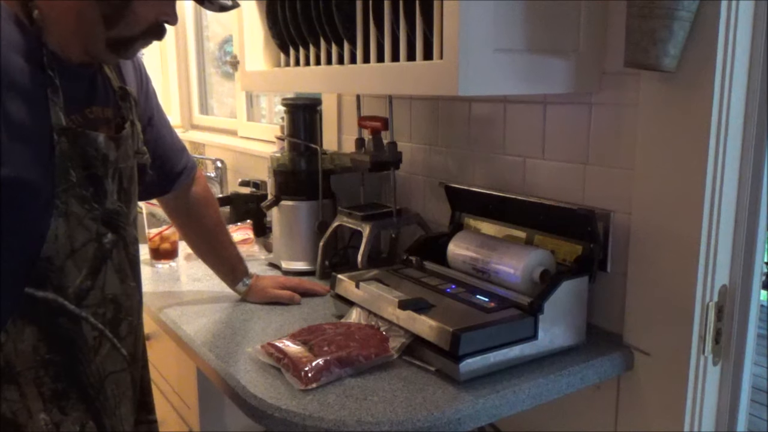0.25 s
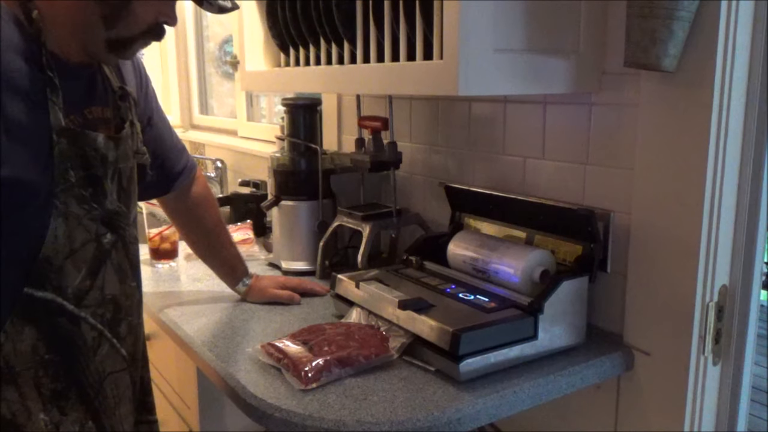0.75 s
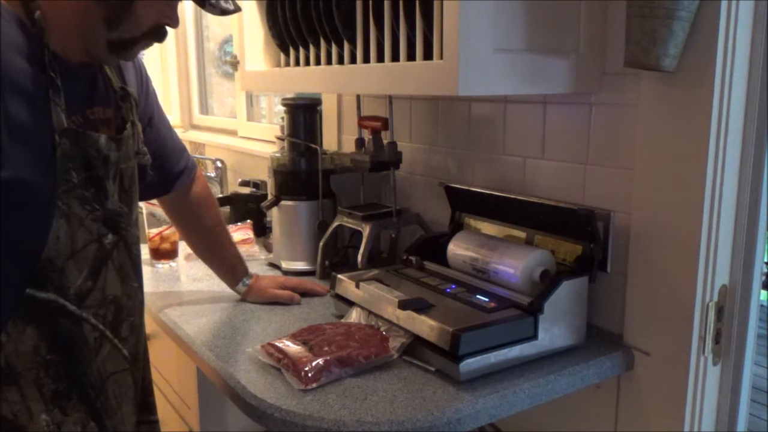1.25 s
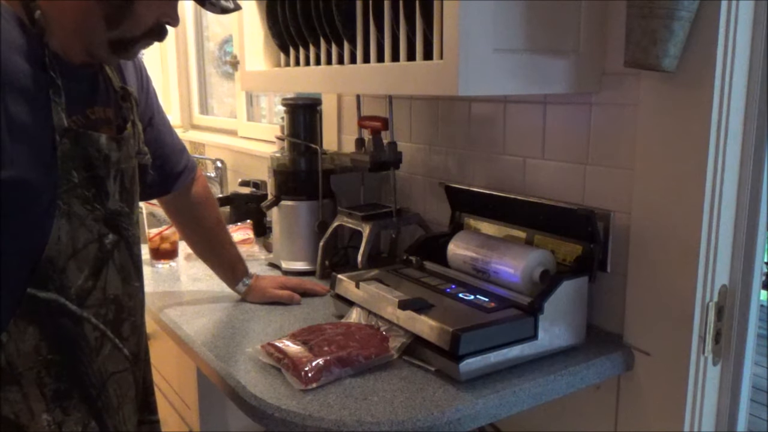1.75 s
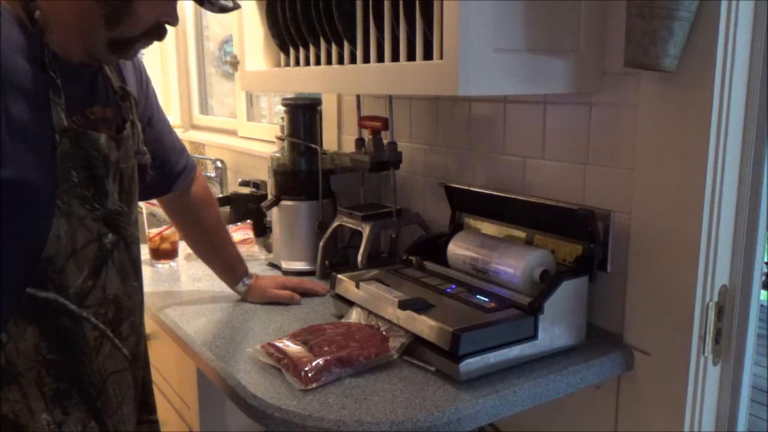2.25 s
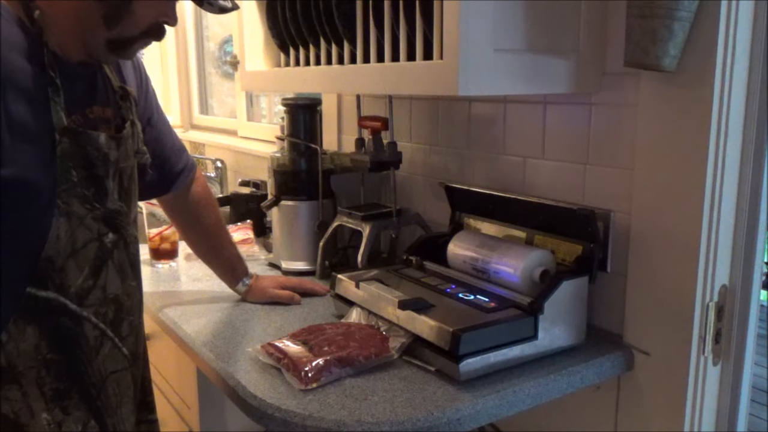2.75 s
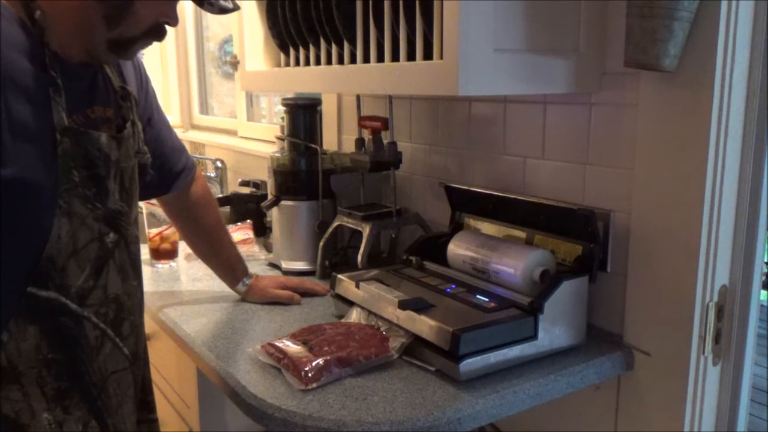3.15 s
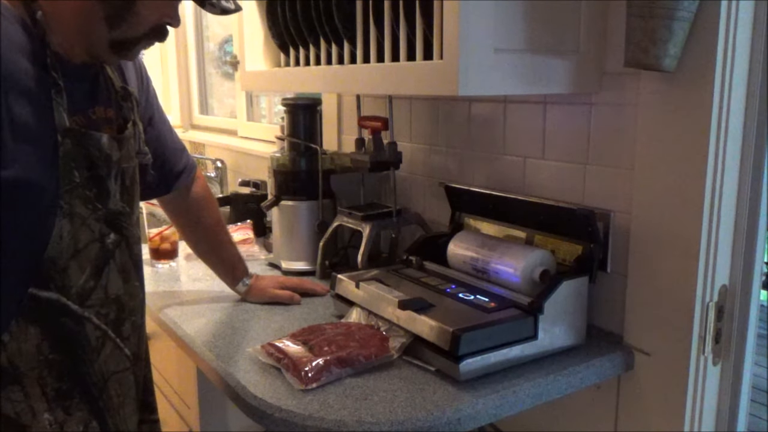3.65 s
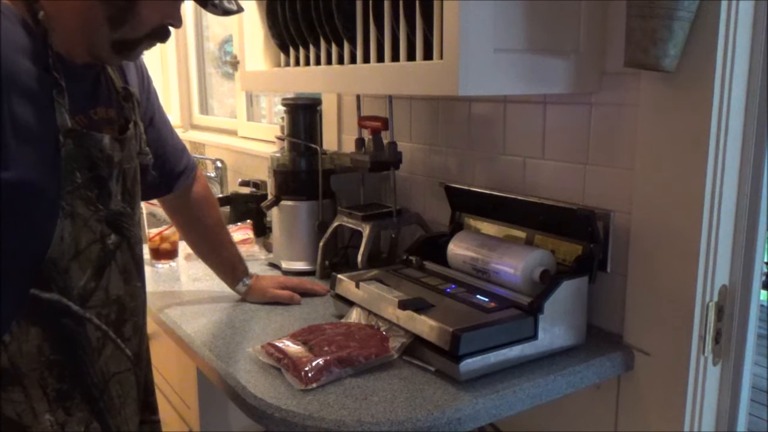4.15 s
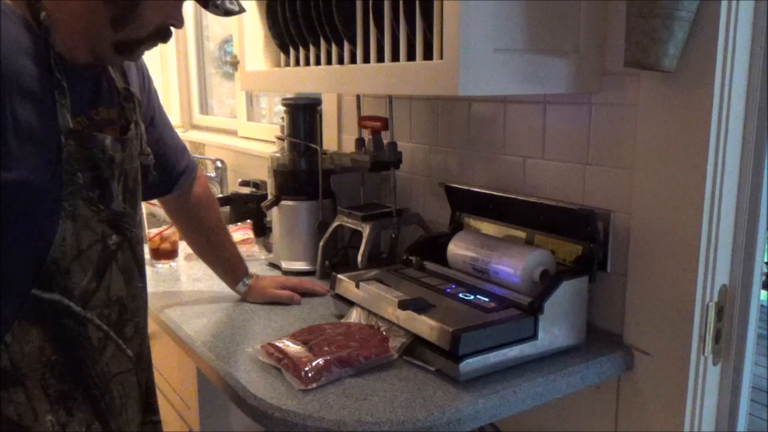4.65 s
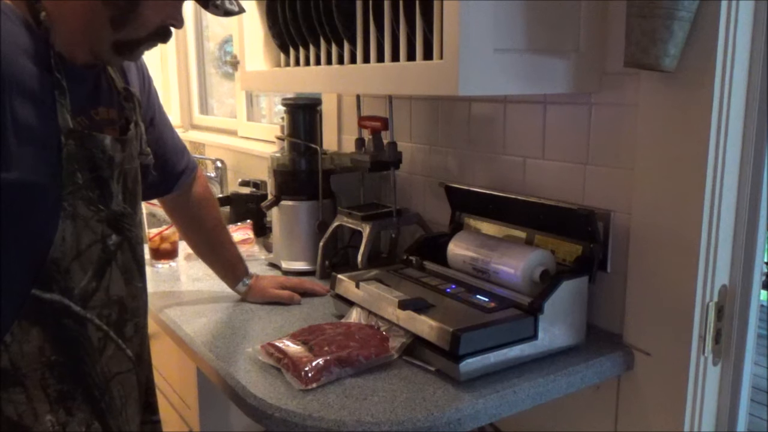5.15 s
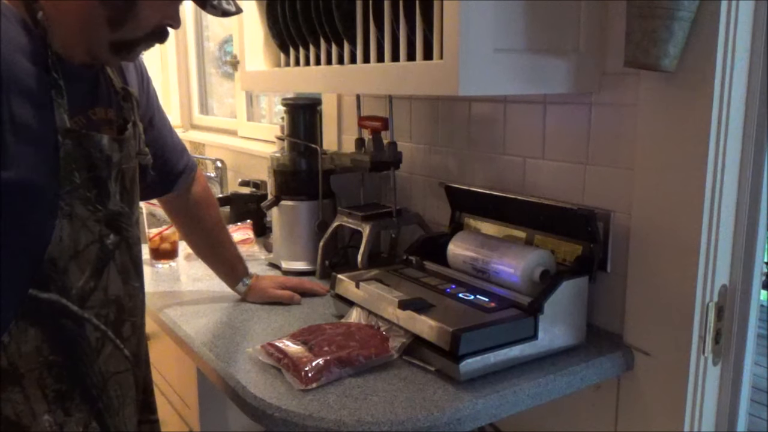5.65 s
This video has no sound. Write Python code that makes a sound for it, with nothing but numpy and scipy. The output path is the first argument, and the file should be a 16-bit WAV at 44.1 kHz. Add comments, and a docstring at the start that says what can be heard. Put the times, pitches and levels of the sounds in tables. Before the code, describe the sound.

A kitchen vacuum sealer pump drones and rattles steadily, then cuts out with dull thumps, leaving quiet room hum and two faint squeaks.

```python
"""Vacuum sealer in a small kitchen

A vacuum sealer pumps air out of a bag, cuts out and gives a few last thumps, then two thin squeaks of air.
Steady tones locked to the turning shaft make the drone; they shift as the bag tightens.
Knocks and valve clicks in each turn ring the casing and valve plate, and shaped noise makes the air.
The tiled room answers the rattle; a low appliance hum and faint hiss run throughout."""
import sys
import numpy as np
from scipy import signal
from scipy.fft import rfft, irfft, next_fast_len
from scipy.io import wavfile
from scipy.ndimage import uniform_filter1d, map_coordinates

SR = 44100
rng = np.random.default_rng(int(sys.argv[2]) if len(sys.argv) > 2 else 0)


def store_pcm(level_fs):
    """Save levels as 16-bit WAV."""
    pcm = np.round(np.clip(level_fs, -1, 1) * 32767).astype(np.int16)
    wavfile.write(sys.argv[1], SR, np.atleast_2d(pcm).T)


N = 260631
STOP_S = 4.7006  # the motor cuts out

# shaft speed, briefly freed as the bag collapses: time_s, speed (turns a second)
SHAFT_SPEED = [(0, 43.699), (0.6, 43.715), (1.4, 43.661), (2.6, 43.742), (3.73, 43.782), (3.88, 44.268),
               (4.01, 43.794), (4.7, 43.838)]
# contacts within one turn: delay_s, knock_relative_db, click_relative_db, air_relative_db,
# timing_scatter_s, unevenness_db
STROKE_CONTACTS = [(0, 0, -7, -9, 0.00002, -1.5), (.0011, -12, -9.5, -9.5, 0.000061, 3.5),
                   (.00469, 7, -2, -5, .000008, 1.6)]


def amp(db):
    """Turn decibels into a gain."""
    return 10 ** (np.asarray(db) / 20)


def unit(x):
    """Scale x to an average (rms) level of 1."""
    return x / np.sqrt(np.mean(x ** 2) + 1e-20)


def along(points, hz):
    """Read a value between (Hz, value) points on a logarithmic pitch axis."""
    point_hz, values = np.transpose(points)
    return np.interp(np.log(hz + 1), np.log(point_hz + 1), values)


def curves(rows):
    """Give one value per sample for each column after the time."""
    times, *columns = np.transpose(rows)
    return [np.interp(np.arange(N) / SR, times, column) for column in columns]


def wobble(rate):
    """Make a smooth random curve with rate random points a second."""
    knots = rng.standard_normal(int(N * rate / SR) + 4)
    return map_coordinates(knots, [np.arange(N) * rate / SR])


def filtered(x, response):
    """Filter x by multiplying its spectrum by a response to frequency."""
    size = next_fast_len(N + SR // 2)
    spectrum = rfft(x, size) * response(np.fft.rfftfreq(size, 1 / SR))
    return irfft(spectrum, size)[..., :N]


def rush(spectrum, alike):
    """Shape noise by frequency, in stereo at rms 1; alike sets how similar the two ears are."""
    def mid_side_gains(hz):
        angle = np.arccos(np.clip(along(alike, hz), -1, 1)) / 2
        return amp(along(spectrum, hz)) * [np.cos(angle), np.sin(angle)]

    mid, side = filtered(rng.standard_normal((2, N)), mid_side_gains)
    return unit(np.array([mid + side, mid - side]))


def pulses(times, sizes):
    """Place impulses, each shared between its two nearest samples."""
    at = np.clip(times.ravel() * SR, 0, N - 2)
    whole, part = at.astype(int), at % 1
    first = np.bincount(whole, sizes.ravel() * (1 - part), N)
    second = np.bincount(whole + 1, sizes.ravel() * part, N)
    return first + second


def body(modes, hz):
    """Add up a body's resonances: one response row for a slack bag, one for a tight bag."""
    total = 0
    for k, (center, width, slack_db, tight_db) in enumerate(modes):
        resonance = 1j * hz * width / (center * center - hz * hz + 1j * hz * width)
        total = total + (-1) ** k * amp([[slack_db], [tight_db]]) * resonance
    return total


def ring(force, modes, vacuum):
    """Strike a body's resonances, blending slack and tight versions, at rms 1."""
    slack, tight = filtered(force, lambda hz: body(modes, hz))
    return unit(slack * (1 - vacuum) + tight * vacuum)


def run_out(t60):
    """Hold 1 while the motor runs, then fall 60 dB in every t60 seconds."""
    return amp(-60 * np.maximum(np.arange(N) / SR - STOP_S - .01, 0) / t60)


def shaft_orders(count=56):
    """Find the strength of each multiple of the shaft speed; knock spacing favours about every fifth."""
    # chassis on the counter: pitch_hz, width_hz, slack_relative_db, tight_relative_db
    chassis = [(119.2, 18.5, -29.5, -28), (127, 15.2, -37, -31.5), (218.44, 15, -37.5, -37),
               (246.1, 19.3, -31, -32.5), (334, 10.3, -48.5, -45), (384.3, 17, -35, -31.5),
               (475.3, 10.4, -41.5, -45.5), (535, 44, -41.2, -41)]
    # plastic housing: pitch_hz, width_hz, slack_relative_db, tight_relative_db
    housing = [(744, 65, -34.5, -36.5), (781.4, 23.7, -35.5, -39), (865, 37, -50, -53.5),
               (1031.2, 32.5, -35.5, -36.1), (1144.5, 118, -36, -41.5), (1140.4, 39.3, -32, -41.5),
               (1599, 39, -40, -36), (1726, 26.7, -34, -36.2), (1729.4, 115, -33, -33),
               (1904, 260, -40, -35), (1938, 111, -43, -34), (2096, 30, -41.5, -49), (2332, 64, -40, -46),
               (2320, 17, -38, -81)]
    chassis_lag_s, housing_lag_s = -0.00032, 0.00047  # relative to the rattle

    orders = np.arange(2, count + 1)
    hz = orders * SHAFT_SPEED[0][1]
    delay, knock_db = np.transpose(STROKE_CONTACTS)[:2]

    def late(seconds):
        return np.exp(-2j * np.pi * hz * seconds)

    strike = sum(amp(db) * late(s) for s, db in zip(delay, knock_db))
    bodies = body(chassis, hz) * late(chassis_lag_s) + body(housing, hz) * late(housing_lag_s)
    slack, tight = strike * bodies
    return zip(orders, hz, slack, tight)


def drone(turns, vacuum, unrest, ear_spread_rad=0.32, drift_db=1.1, waver_db=3):
    """Sum tones at multiples of the shaft speed, their strengths shifting as the bag tightens."""
    # where the drone sits between the ears: pitch_hz, left_minus_right_db
    pan = [(90, 0.5), (130, 4.5), (260, 3.5), (350, -7.5), (480, 0), (560, 4), (760, 2.5), (1030, -2),
           (2000, -0.5)]
    t, sides, out = np.arange(N) / SR, np.array([[.5], [-.5]]), np.zeros((2, N))
    knots = np.arange(0, t[-1], 1 / 20)
    for order, hz, slack, tight in shaft_orders():
        slow, quick, slip = rng.standard_normal((3, len(knots)))
        # each tone drifts slowly, and wavers in level and phase more when the load is unsettled
        drift = drift_db * np.interp(t, knots, unit(uniform_filter1d(slow, size=14)))
        waver = waver_db * unrest * np.interp(t, knots, quick)
        phase_slip = 1.18 * min(hz / 800, 1) * unrest * np.interp(t, knots, slip)
        phase = 2 * np.pi * order * turns + phase_slip
        strength = slack + (tight - slack) * vacuum
        tone = np.sqrt(2) * amp(drift + waver) * strength * np.exp(1j * phase)
        ear_phase = np.exp(1j * ear_spread_rad * rng.standard_normal() * sides)
        out += np.real(amp(along(pan, hz) * sides) * ear_phase * tone)
    return out


def echoed(x):
    """Add reflections from the counter, tiles and cupboard close by."""
    # nearby surfaces: delay_s, level_db relative to the direct sound
    echoes = [(.0029, -12.5), (.0041, -40), (.0073, -18), (.0097, -22), (0.0116, -15)]
    return x + sum(amp(db) * np.pad(x, (round(s * SR), 0))[:N] for s, db in echoes)


def strokes(turns, vacuum, knock_rough_db=0.5, spurt_s=0.0017, spurt_db=-16, leak_db=-22):
    """Each turn the piston knocks on the casing, the valves click and air spurts past them."""
    # pump casing resonances: pitch_hz, width_hz, slack_relative_db, tight_relative_db
    casing = [(2641, 59, 5.5, 10.5), (2685, 108, 0, 1), (2760, 130, -1.5, -3.5), (3140, 400, -10, -6),
              (3201, 62, 2, -1), (3660, 135, -8, -6), (3870, 235, -9.5, -5), (4094, 116, -12, -7),
              (4600, 93, -10.5, -7)]
    # valve plate resonances: pitch_hz, width_hz, slack_relative_db, tight_relative_db
    valve = [(1870, 214, 1, -1), (3330, 630, -8.5, -17), (4600, 250, -18.5, -8), (6017, 326, -3.5, -5),
             (6120, 153, -6.5, 2), (6445, 327, 0, -0.5), (6935, 150, 1, -1), (7340, 170, -5, -3.5),
             (7834, 195, 2, 3), (7942, 410, -1.5, 0.5), (9490, 360, -7.5, -7), (9707, 237, -7, -7.5),
             (10300, 1150, -13, -14.5)]

    starts = np.interp(np.arange(np.ceil(turns[0]), 1), turns, np.arange(N) / SR)
    delay, knock_db, click_db, air_db, scatter, uneven_db = np.transpose(STROKE_CONTACTS)
    early, hard, sharp = rng.standard_normal((3, len(starts), len(STROKE_CONTACTS)))
    sharp = np.tanh(sharp)  # a valve's travel is limited
    times = starts[:, None] + delay + scatter * early
    knocks = pulses(times, amp(knock_db + knock_rough_db * hard))
    clicks = pulses(times, amp(click_db + uneven_db * sharp))

    # each opening lets out a quickly fading spurt, over a small steady leak
    fade = np.exp(-np.arange(SR // 50) / SR / spurt_s)
    opening = signal.fftconvolve(pulses(times, amp(air_db + uneven_db * sharp)), fade)[:N]
    spurts = (opening + amp(leak_db) * run_out(.03)) * rng.standard_normal(N)
    knock = ring(echoed(knocks), casing, vacuum)
    clatter = ring(echoed(clicks + amp(spurt_db) * spurts), valve, vacuum)
    return knock, clatter


def airflow():
    """Air through the pump is shaped noise that fades after the motor stops."""
    # colour of the air noise: pitch_hz, relative_db (per Hz)
    air_colour = [(20, -21), (45, -12), (110, -6), (220, -4), (310, -6), (480, -3), (620, -6.5),
                  (800, -2.5), (960, -5.5), (1080, -1), (1310, -9), (1800, -5), (2450, -8), (2700, -8),
                  (4200, -12.5), (11000, -25.5)]
    return rush(air_colour, [(50, 0.65), (8000, 0.86)]) * run_out(0.52)  # (Hz, left-right likeness)


def room(x):
    """Answer x with decaying noise, each frequency dying at its own speed."""
    # kitchen walls: pitch_hz, t60_s (time to fall 60 dB)
    walls = [(150, 0.94), (1000, 0.98), (1750, 0.16), (3000, 0.2), (6000, 0.34), (11000, 0.14)]
    hz, t, z = signal.stft(rng.standard_normal((2, SR // 2)), SR, nperseg=256)
    decay = amp(-60 * t / along(walls, hz)[:, None])
    tail = signal.istft(z * decay, SR, nperseg=256)[1]
    mid, side = tail / np.linalg.norm(tail[0]) * amp([[0], [-3]])
    delayed = np.pad(x, (150, 0))[None]  # samples
    return signal.fftconvolve(delayed, np.array([mid + side, mid - side]), axes=1)[:, :N]


def pump():
    """One shaft times the drone, knocks and valve clatter; air, last thumps and room answer join them."""
    # how far the bag is drawn tight: time_s, tightness (0-1)
    bag_tightness = [(0, 0.21), (1.9, 0.27), (3.1, 0.64), (3.8, 0.9), (4.7, 0.65)]
    collapse_s, collapse_half_s = 3.89, 0.069  # the bag collapses once and unsettles the load
    steady_unrest, collapse_unrest = 0.23, 0.73  # (0-1)

    speed, = curves(SHAFT_SPEED)
    turns = np.cumsum(speed) / SR
    turns -= turns[round(STOP_S * SR)]  # the last stroke is turn 0
    vacuum, = np.clip(curves(bag_tightness), 0, 1)
    collapse = np.exp(-((np.arange(N) / SR - collapse_s) / collapse_half_s) ** 2)
    unrest = steady_unrest + collapse_unrest * collapse

    knock, clatter = strokes(turns, vacuum)
    rattle = amp(-30.5) * knock + amp(-25.0) * clatter
    tone = amp(-0.34) * drone(turns, vacuum, unrest)
    low = filtered(tone, lambda hz: 1 / (1 + (hz / 1300) ** 8))
    high = tone - low
    # at the stop the low part fades evenly; the high part drops fast to a weaker, longer tail
    hum = low * run_out(0.28) + high * (0.72 * run_out(.03) + 0.17 * run_out(0.62))
    return hum + amp(-29.0) * airflow() + rattle + coast() + amp(-9.0) * room(rattle)


def background():
    """Mix shaped room noise, a narrow hiss and the slightly unsteady tones of an appliance."""
    # room noise colour: pitch_hz, relative_db (per Hz)
    kitchen = [(25, -17), (55, -21), (85, -3), (150, 0.5), (300, 1), (430, -3.5), (700, -4.5),
               (1300, -12.5), (3000, -17.5), (4000, -19.5), (7200, -18), (8200, -23), (11000, -24.5)]
    # appliance tones: pitch_hz, level_db (rms, before a slight wobble)
    appliance_tones = [(59.5, -65), (148.5, -53), (194, -59), (243, -62)]
    # similarity of the ears: pitch_hz, left_right_likeness (0-1)
    alike = [(60, 0.61), (220, 0.93), (830, 0.96), (3080, 0.9), (11400, 0.83)]

    t = np.arange(N) / SR
    hum = np.zeros(N)
    for hz, db in appliance_tones:
        level = amp(db + wobble(3.6)) * np.sqrt(2)
        hum += level * np.sin(2 * np.pi * hz * t + .5 * wobble(3.13))
    # hiss colour: (Hz, relative dB per Hz)
    hiss = rush([(3500, -40), (4300, -1), (4950, 7), (5700, -4), (7500, -28)], alike)
    return hum + amp(-48) * rush(kitchen, alike) + amp(-58.5) * hiss


def coast(hz=172, t60=0.062):
    """Without power the piston gives a few last dull thumps, each a short decaying low tone."""
    # soft last strokes: start_s, relative_db
    last_strokes = [(4.706, -17), (4.728, -15), (4.753, -18), (4.788, -41)]
    starts, db = np.transpose(last_strokes)
    t = np.arange(SR // 4) / SR
    soft_start = 1 - np.exp(-t / 0.003)
    thump = np.sin(2 * np.pi * hz * t) * amp(-60 * t / t60) * soft_start
    return signal.fftconvolve(pulses(starts, amp(db)), thump)[:N]


def squeaks():
    """Air whistles faintly through a small gap: short swelling tones with a jittery phase."""
    # thin squeaks after the stop: middle_s, pitch_hz, half_length_s, peak_db
    whistles = [(5.46, 4380, .018, -58), (5.52, 4380, .016, -58)]
    t = np.arange(N) / SR
    out = np.zeros(N)
    for middle, hz, half_length, db in whistles:
        swell = amp(db) * np.exp(-((t - middle) / half_length) ** 2)
        out += swell * np.sin(2 * np.pi * hz * t + wobble(150))
    return out


def scene():
    """Add the pump, the squeaks and the kitchen background."""
    return pump() + squeaks() + background()


def record(dry):
    """Cut the treble very steeply above a top frequency."""
    top_hz = 11150
    return filtered(dry, lambda hz: 1 / (1 + (hz / top_hz) ** 160))


dry = scene()
out = record(dry)
store_pcm(out)
```